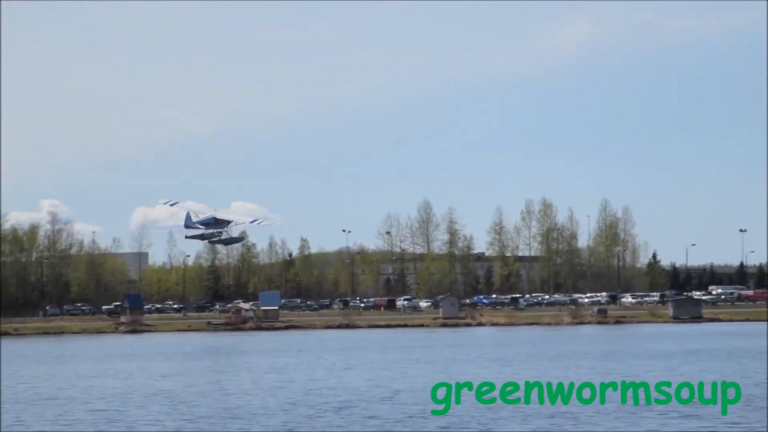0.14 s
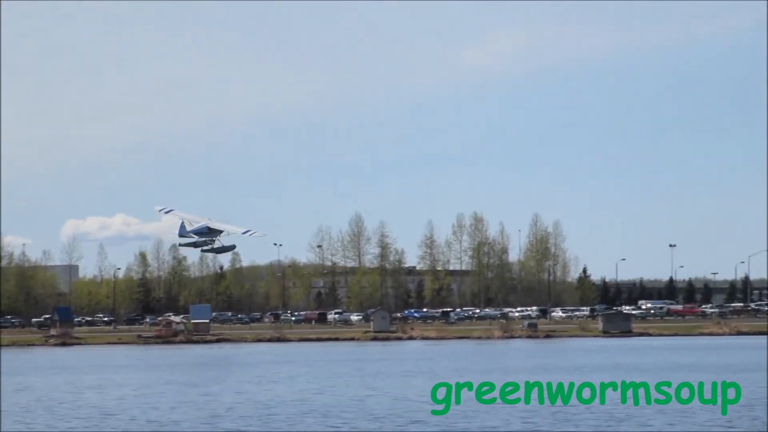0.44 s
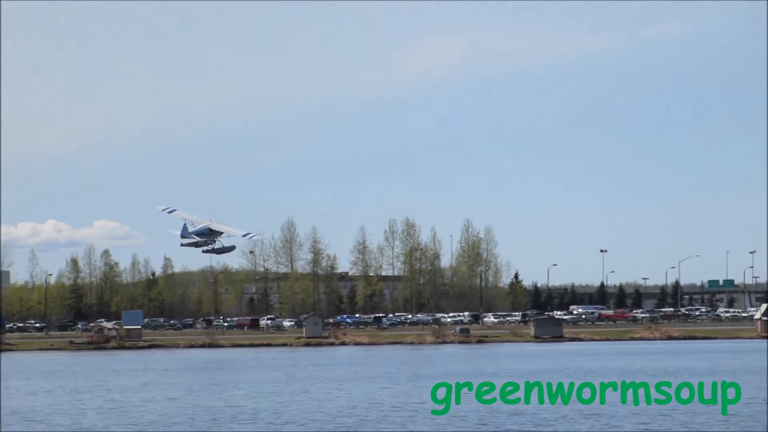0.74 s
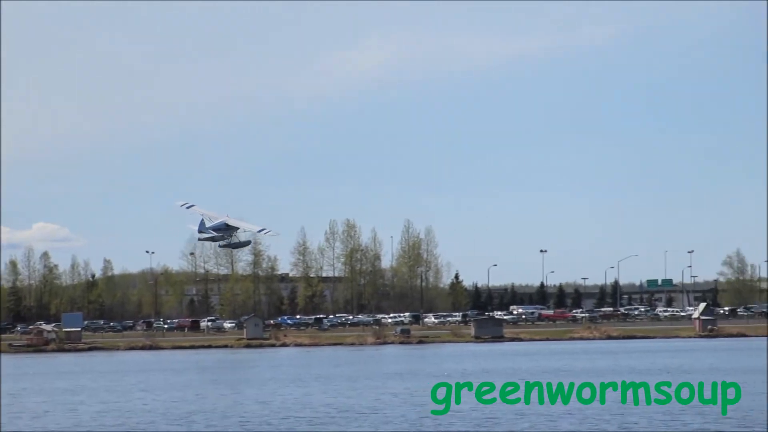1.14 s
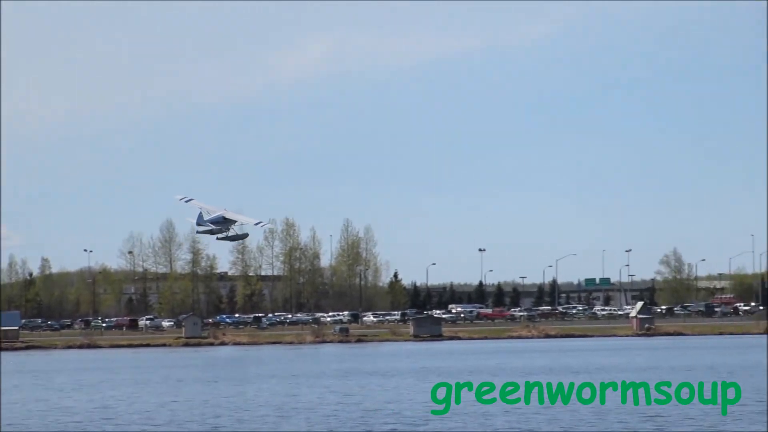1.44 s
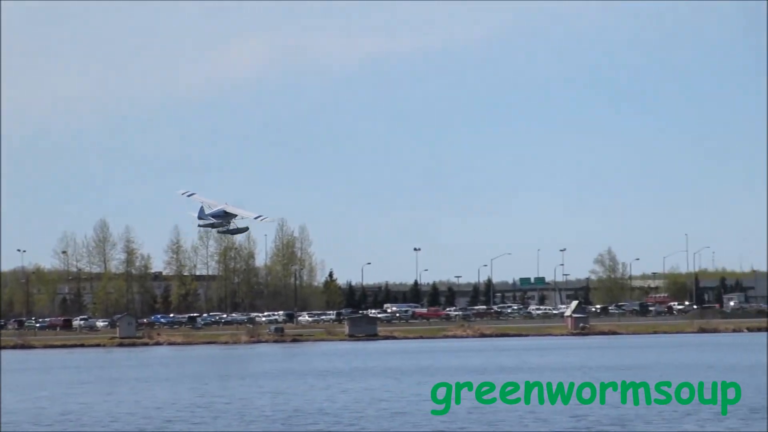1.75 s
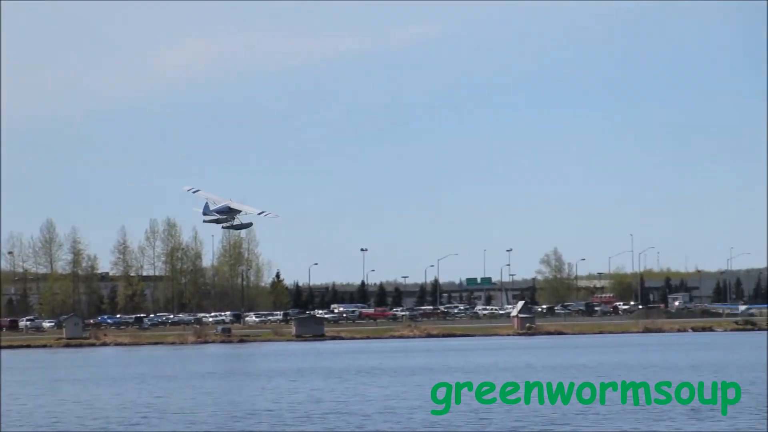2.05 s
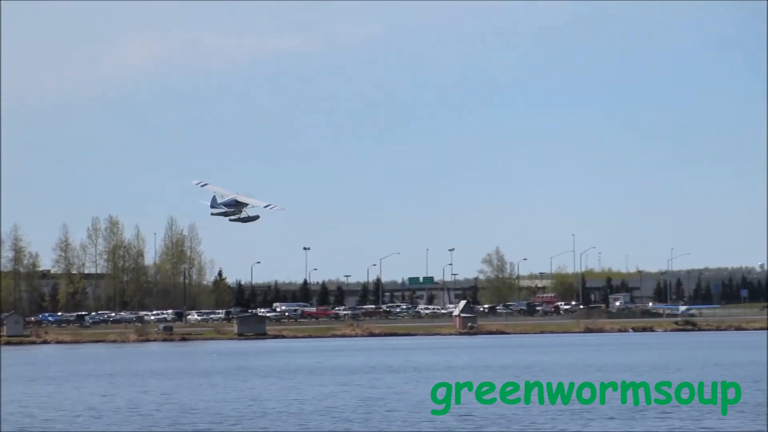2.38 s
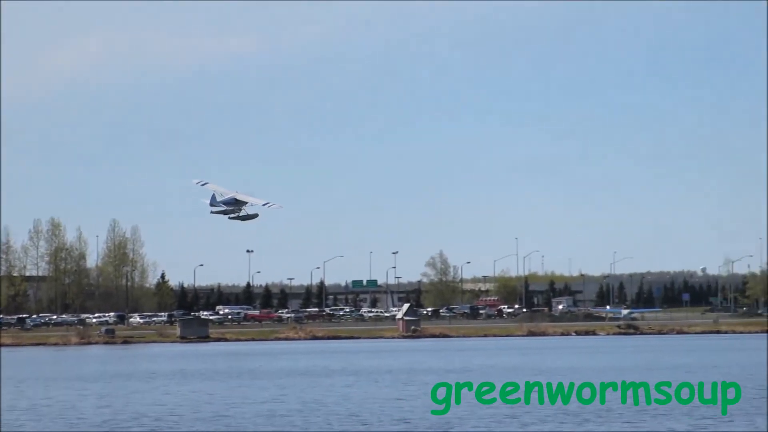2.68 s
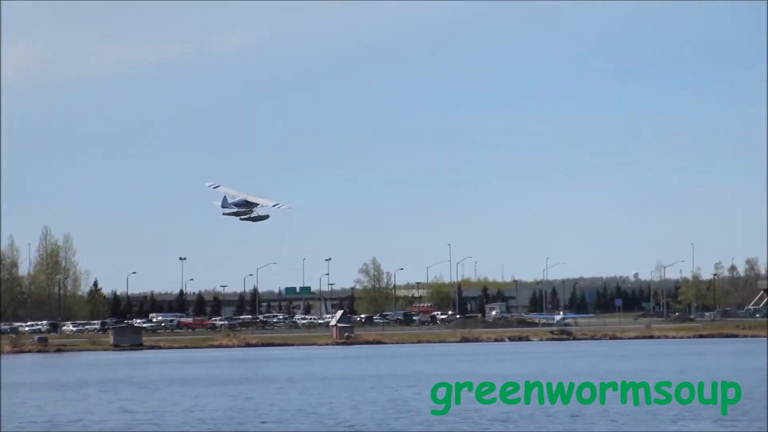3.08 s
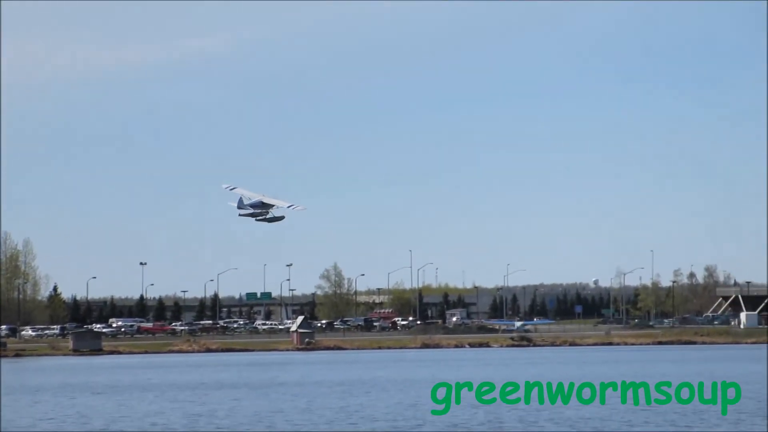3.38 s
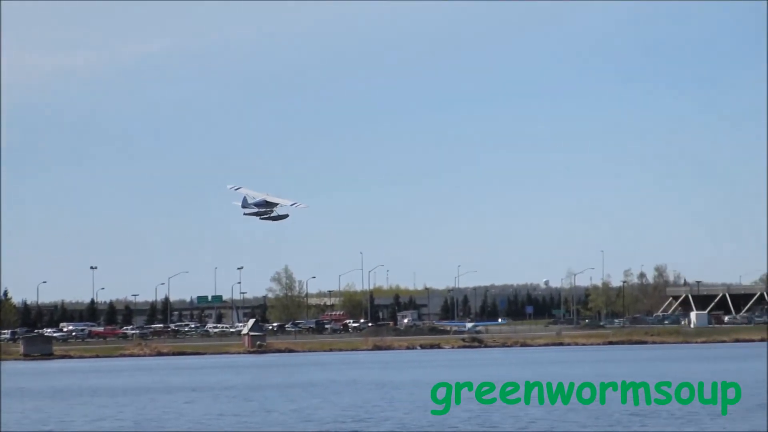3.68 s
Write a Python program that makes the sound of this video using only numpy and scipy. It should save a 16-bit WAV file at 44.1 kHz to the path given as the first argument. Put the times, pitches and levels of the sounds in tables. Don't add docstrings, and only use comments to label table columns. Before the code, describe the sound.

A small propeller plane's engine drones steadily, wavering and slowly fading as it flies away.

```python
import sys
import numpy as np
from scipy import signal
from scipy.fft import rfft, irfft
from scipy.io import wavfile

SR = 44100
rng = np.random.default_rng(int(sys.argv[2]) if len(sys.argv) > 2 else 0)


def natural_amplitude(level_db):
    exponent = np.asarray(level_db, float) / 20
    return 10 ** exponent


def wav_out(sig):
    wavfile.write(sys.argv[1], SR, np.round(np.clip(np.atleast_2d(sig).T, -1, 1) * 32767).astype(np.int16))


N = 168462
T = np.arange(N) / SR

# time in seconds, blade tone in dB, octave in dB.
BLADE_SWELL = [(0.03, -27.5, -17.5), (0.07, -26, -22.5), (0.35, -15, -21), (0.63, -25.5, -22.5),
               (0.96, -19, -21), (1.17, -21, -23.5), (1.34, -22.5, -32), (1.42, -16.5, -21.5),
               (1.79, -31, -23), (1.87, -23.5, -30), (2.11, -18.5, -26), (2.27, -27, -35),
               (2.36, -27.5, -27), (2.47, -25, -37.5), (2.53, -20.5, -28), (3.37, -22.5, -28),
               (3.79, -27, -28)]
# time in seconds, body in dB, crack in dB.
AIR_PATH = [(0.03, -27, -46), (0.05, -25.5, -43.5), (0.29, -26.5, -43.5), (0.34, -28.5, -48),
            (0.35, -28, -37.5), (0.36, -26.5, -46), (0.52, -31, -44.5), (0.56, -29, -48), (0.93, -30, -47),
            (1.19, -34, -51), (1.42, -34, -55), (1.56, -32, -47.5), (2.0, -31.5, -54), (2.31, -29, -49.5),
            (2.89, -37.5, -61), (3.24, -34, -56.5), (3.79, -28.5, -51)]
# multiple of the four-stroke cycle rate, level in dB.
ENGINE_ORDERS = [(1, -46.5), (2, -22), (3, -18.5), (4, 0), (5, -20), (6, -19), (7, -35), (8, -4.5),
                 (9, -17), (10, -21), (11, -24), (12, -8.5), (13, -23.5), (14, -20), (15, -20), (16, -12.5),
                 (17, -26), (18, -25), (19, -31), (20, -18.5), (21, -27.5), (22, -23), (23, -14.5),
                 (24, -10), (25, -17), (26, -14), (27, -23.5), (28, -15.5), (29, -19), (30, -21.5),
                 (31, -19), (32, -21), (33, -25), (34, -18), (35, -27), (36, -21.5), (37, -23.5), (38, -27),
                 (39, -30.5), (40, -34)]
CYLINDER_LEVEL = [0, -4.0, 1, -3.0]
# frequency in Hz, width in Hz, level in dB, how strongly the path drives it in dB per dB.
PIPE_RESONANCES = [(513, 260, -34.5, 0.35), (704, 200, -39, 0.62), (1058, 400, -40, 0.58),
                   (1453, 297, -33.5, 0.82), (1863, 292, -35.5, 1.3), (2360, 340, -49, 2.8),
                   (3320, 940, -47.5, .95), (5030, 700, -72, 2.2), (5740, 1200, -64.5, 1.7),
                   (7240, 1000, -74, 1.4)]
# frequency in Hz, gain in dB.
EXHAUST_ROLLOFF = [(20, 0), (6300, 0), (8000, -14), (11000, -40)]
# frequency in Hz, density in dB per Hz.
ROAR_SPECTRUM = [(30, -12), (60, -2.5), (245, -5), (400, -9), (600, -10.5), (900, -10.5), (1900, -15.5),
                 (3000, -32.5), (6000, -61.5)]
# frequency in Hz, side minus mid in dB.
SCATTER_SPECTRUM = [(60, -32.5), (140, -28.5), (330, -17.5), (520, -15), (1200, -11.5), (2800, -11.5),
                    (5500, -3), (12000, -1.5)]
# frequency in Hz, density in dB per Hz.
WIND_SPECTRUM = [(25, -19), (45, -11), (80, 1), (200, -2.5), (400, -14.5), (900, -48)]
# time in seconds, level in dB, pitch in Hz, left minus right in dB.
WIND_BUMPS = [(0.203, -18, 278, 12), (.31, -18, 220, 14), (0.639, -14, 152, -6), (1.101, -28, 199, 1),
              (1.217, -25, 200, 12), (1.905, -28, 199, 13), (2.145, -22, 222, 11), (2.686, -13.5, 170, -7),
              (2.93, -22.5, 200, 8), (3.216, -18.5, 180, 6), (3.764, -25, 200, 15)]
# frequency in Hz, density in dB per Hz.
HISS_SPECTRUM = [(3000, -11), (5000, 8), (8000, -0.5), (11000, -3), (14000, -5), (15900, -13)]

FIRING_HZ, FIRST_FIRING_S = 79.85, 0.0042
RECEDE_DB_PER_S = -1


def evened(x):
    return x / np.sqrt(np.mean(x ** 2) + 1e-20)


def coloured(x, points):
    f, db = np.transpose(points)
    hz = np.fft.rfftfreq(N, 1 / SR)
    gain_db = np.interp(np.log(hz + 1), np.log(f + 1), db, db[0] - 20, db[-1] - 90)
    return irfft(rfft(x) * natural_amplitude(gain_db), N)


def drift(top_hz):
    hz = np.geomspace(0.3, top_hz, 16)[:, None]
    phase_turns = rng.random((16, 1))
    coarse_t = T[::64]
    waves = np.sin(2 * np.pi * (hz * coarse_t + phase_turns)) / hz ** 0.25
    return np.interp(T, coarse_t, evened(waves.sum(0)))


def resonate(x, hz, width_hz):
    carrier = np.exp(2j * np.pi * hz * T)
    r = np.exp(-np.pi * width_hz / SR)
    envelope = signal.lfilter([(1 - r) ** 2], [1, -2 * r, r * r], x / carrier)
    return 2 * (carrier * envelope).real


def path_db(column=1):
    rows = np.transpose(AIR_PATH)
    return np.interp(T, rows[0], rows[column] - rows[column].mean())


def drone():
    thump_lag_s, pipe_from_order, pipe_lead_s = 0.002, 18, 0.003
    bend_turns = 0.11
    waver_db, waver_rad = 2, 0.75
    cycle_hz = FIRING_HZ / 4
    cycles = (T - FIRST_FIRING_S - thump_lag_s) * cycle_hz
    level_db = -18 + RECEDE_DB_PER_S * T + 0.2 * path_db()
    s, tone_db, octave_db = np.transpose(BLADE_SWELL)
    blade_db = {4: tone_db, 8: octave_db}
    out = np.zeros(N)
    for k, db in ENGINE_ORDERS:
        if k in blade_db:
            gain_db = np.interp(T, s, blade_db[k]) + 2.1 * drift(23.0)
        else:
            gain_db = level_db + db + waver_db * drift(14.0)
        slip = rng.random() * (k % 4 > 0)
        slip += waver_rad * np.sqrt(k / 16) * drift(9.0) / (2 * np.pi)
        if k < pipe_from_order:
            slip += bend_turns * ((k / 4) ** 2 - 3 * k / 4)
        elif k > pipe_from_order:
            slip += k * pipe_lead_s * cycle_hz
        out -= np.sqrt(2) * natural_amplitude(gain_db) * np.cos(2 * np.pi * (k * cycles + slip))
    return out


def exhaust():
    crack_s, crack_spread_db, crack_from_hz = 0.004, 2.6, 2900
    steady_puff, snap_level = 0.45, 0.15
    firings = (T - FIRST_FIRING_S) * FIRING_HZ + 4
    turns = firings + crack_s * FIRING_HZ
    shot = turns.astype(int)
    u = (turns % 1) / FIRING_HZ / crack_s
    pulse = (u * np.exp(1 - u)) ** 2
    body, crack = path_db(column=1), path_db(column=2)
    out = np.zeros(N)
    for hz, width_hz, db, follow in PIPE_RESONANCES:
        chance_db = crack_spread_db * rng.standard_normal(shot[-1] + 1)
        size = natural_amplitude(np.array(CYLINDER_LEVEL)[shot % 4] + chance_db[shot])
        puff = evened(steady_puff + size * pulse) * rng.standard_normal(N)
        uneven_firings = firings + 0.03 * drift(40.0)
        snap = evened(size * np.append(0, np.diff(uneven_firings.astype(int))))
        ring = evened(resonate(puff + snap_level * snap, hz, width_hz))
        path = crack if hz > crack_from_hz else body
        out += ring * natural_amplitude(db + follow * path + 0.81 * drift(8.0))
    return coloured(out, EXHAUST_ROLLOFF)


def roar():
    level_db = -28 + RECEDE_DB_PER_S * T + 0.14 * path_db()
    return natural_amplitude(level_db) * evened(coloured(rng.standard_normal(N), ROAR_SPECTRUM))


def scattered(x):
    tail_t = T[:9000]
    out = np.zeros(N)
    for k in range(3):
        tail = rng.standard_normal(9000) * natural_amplitude(-60 * tail_t / 0.2)
        window = np.sqrt(2 / 3) * np.cos(np.pi * (1.3 * T + k / 3))
        out += signal.oaconvolve(x * window, tail / np.linalg.norm(tail))[:N]
    return coloured(out, SCATTER_SPECTRUM)


def wind():
    rumble = evened(coloured(rng.standard_normal(N), WIND_SPECTRUM))
    out = np.tile(natural_amplitude(-30.5 + 1.5 * drift(8.1)) * rumble, (2, 1))
    for s, db, hz, pan_db in WIND_BUMPS:
        u = (T - s) * hz * 2
        bump = natural_amplitude(db) * np.exp(-u ** 2) * np.sin(np.pi * u)
        out += bump * natural_amplitude([[pan_db / 2], [-pan_db / 2]])
    return out


def floor():
    shared, opposed, drops = rng.standard_normal((3, N))
    left = coloured(shared + 0.32 * opposed, HISS_SPECTRUM)
    right = coloured(shared - 0.35 * opposed, HISS_SPECTRUM)
    hiss = natural_amplitude(-69) * evened(np.array([left, right]))
    spray_end_s, spray_fade_s = 0.24, 0.02
    fade = 1 / (1 + np.exp(np.minimum((T - spray_end_s) / spray_fade_s, 40)))
    spray = natural_amplitude(-69.5) * evened(resonate(drops, 10000, 4600)) * fade
    whine = natural_amplitude(-88) * np.sin(2 * np.pi * 15735 * T)
    return hiss + spray + whine


def scene():
    plane = drone() + exhaust() + roar()
    side = natural_amplitude(-0.25) * scattered(plane) + 0.4 * np.gradient(plane)
    return np.array([plane + side, plane - side]) + wind() + floor()


def band_limit(x):
    return signal.sosfilt(signal.butter(12, 15770, fs=SR, output="sos"), x)


def record(dry):
    return band_limit(dry)


dry = scene()
out = record(dry)
wav_out(out)
```